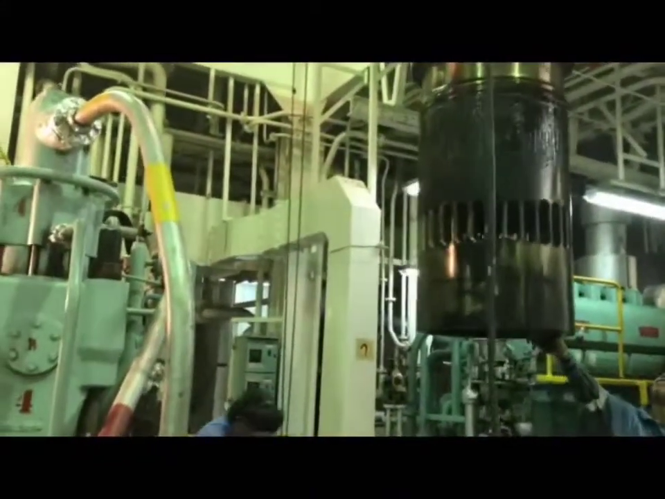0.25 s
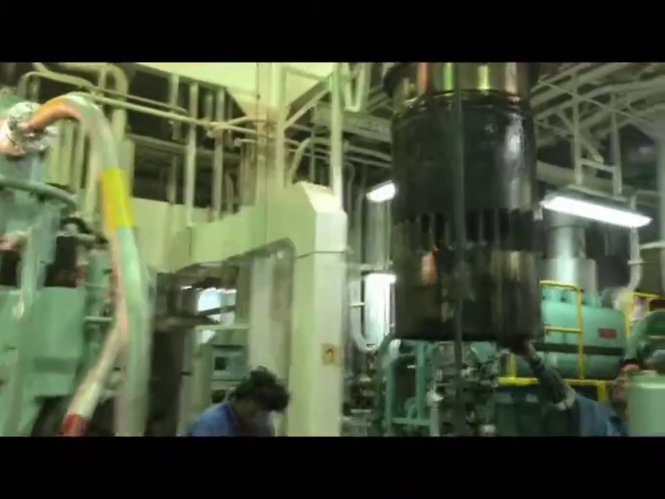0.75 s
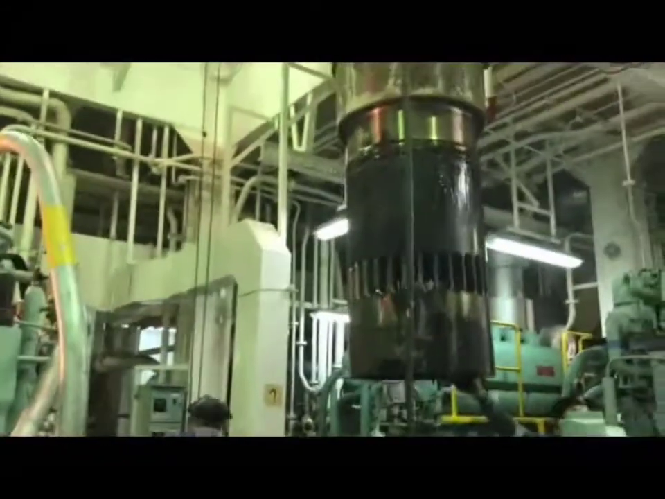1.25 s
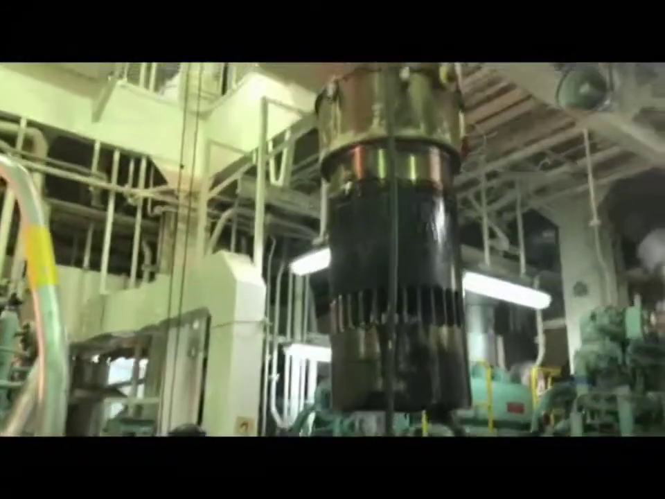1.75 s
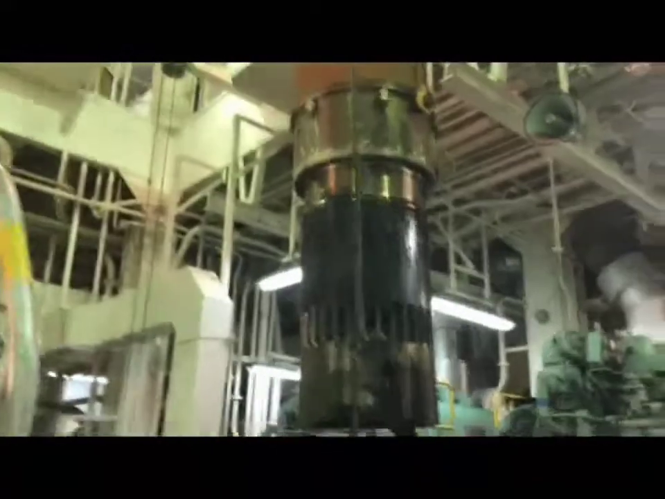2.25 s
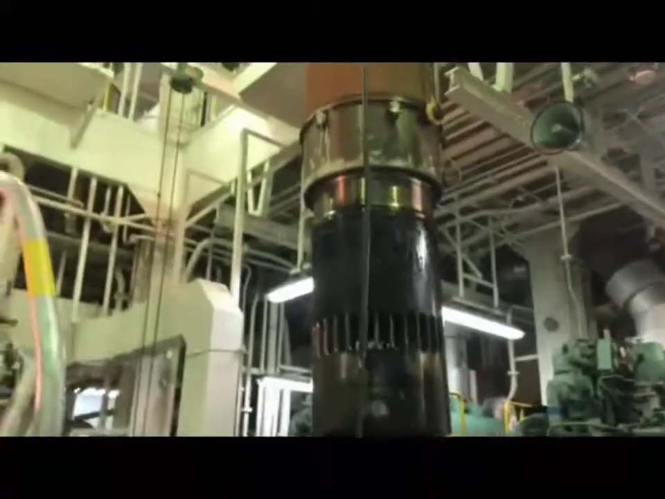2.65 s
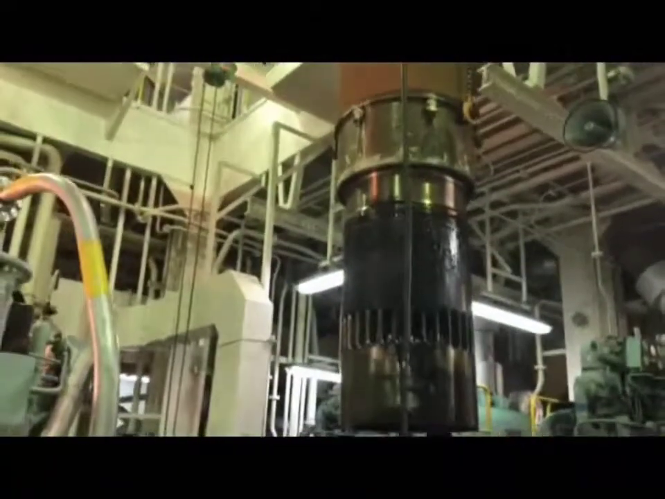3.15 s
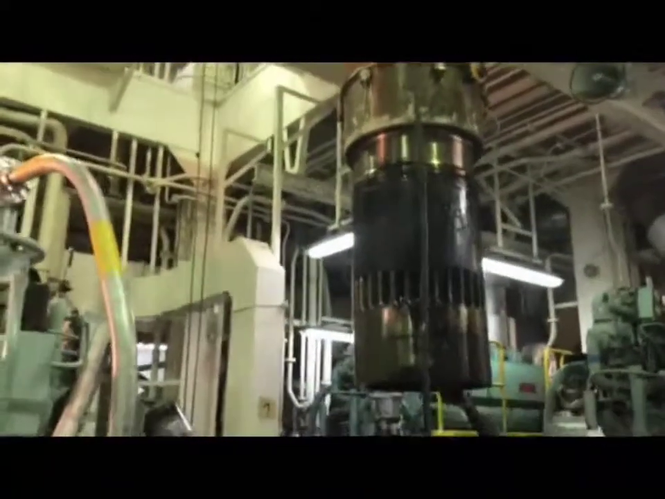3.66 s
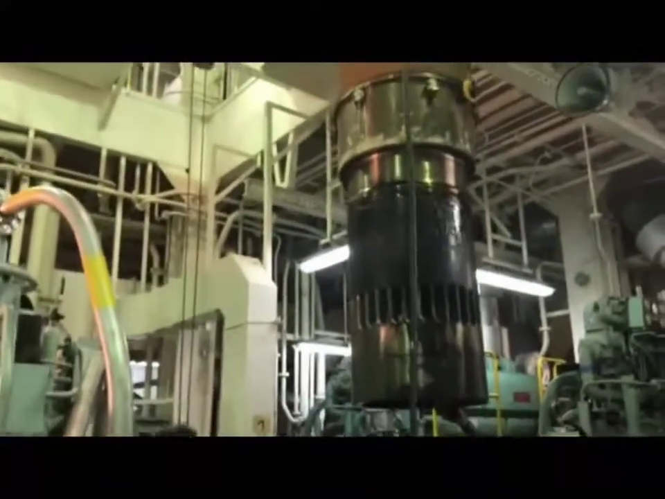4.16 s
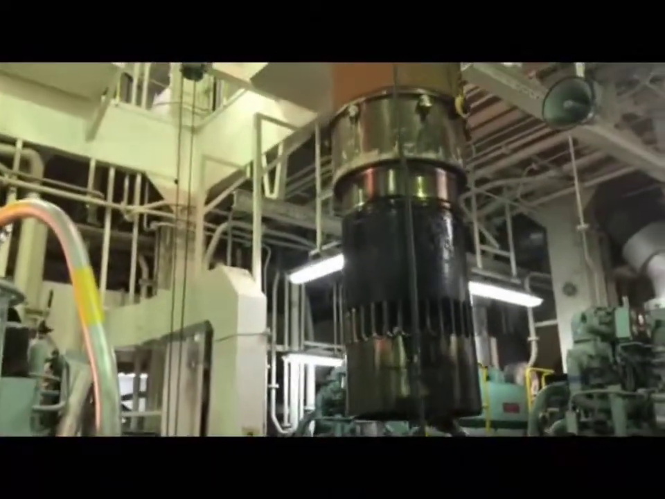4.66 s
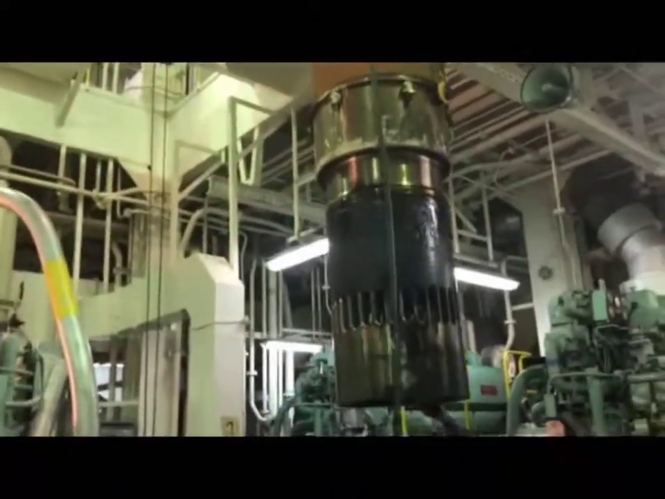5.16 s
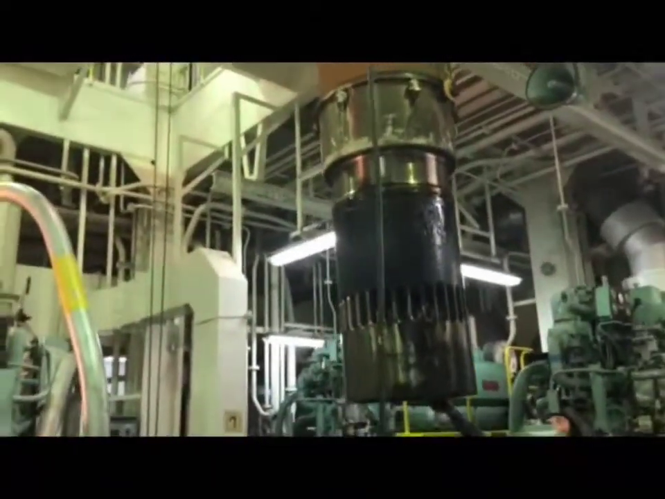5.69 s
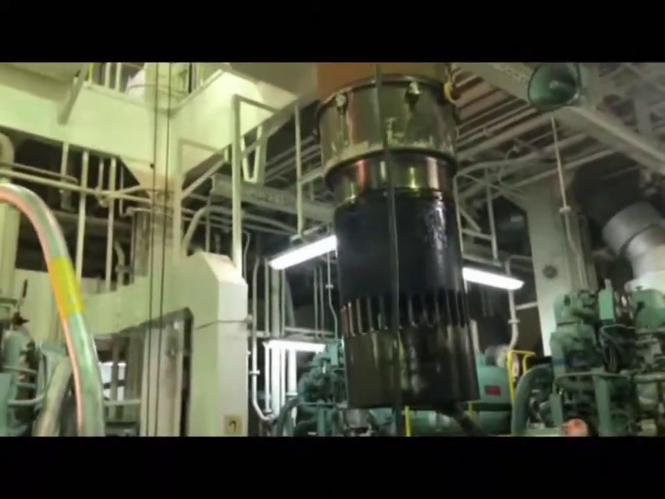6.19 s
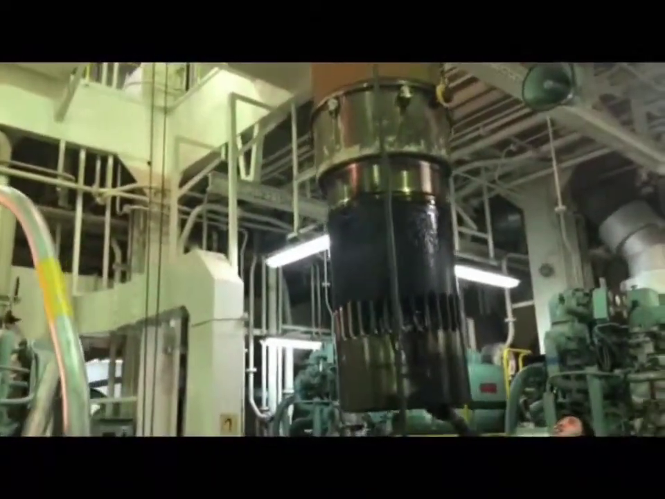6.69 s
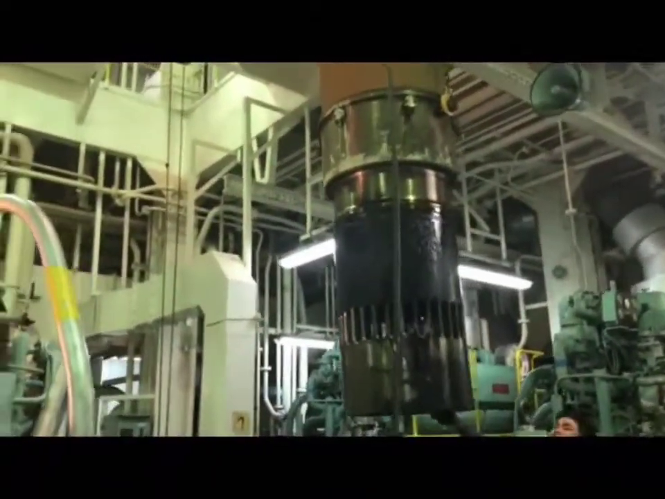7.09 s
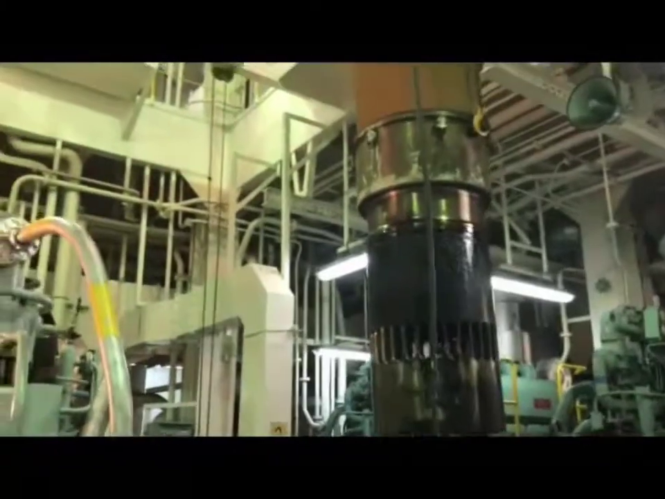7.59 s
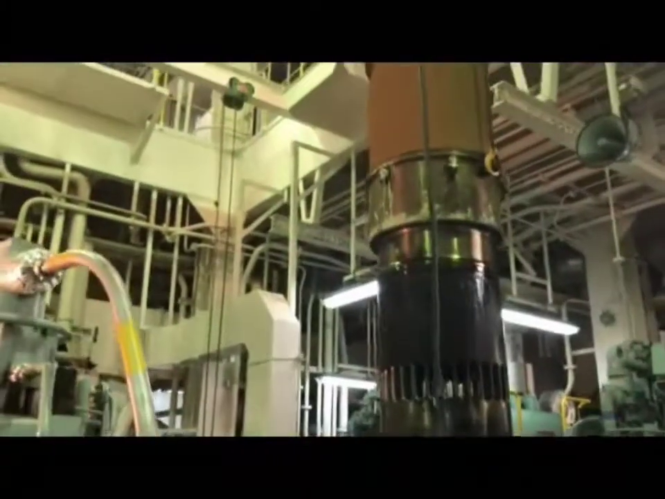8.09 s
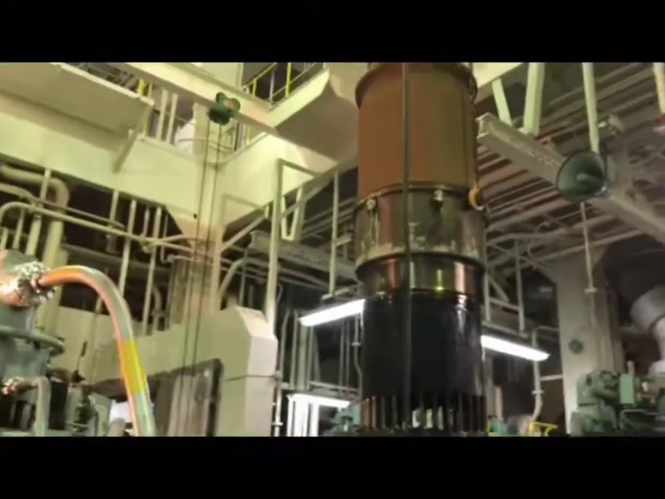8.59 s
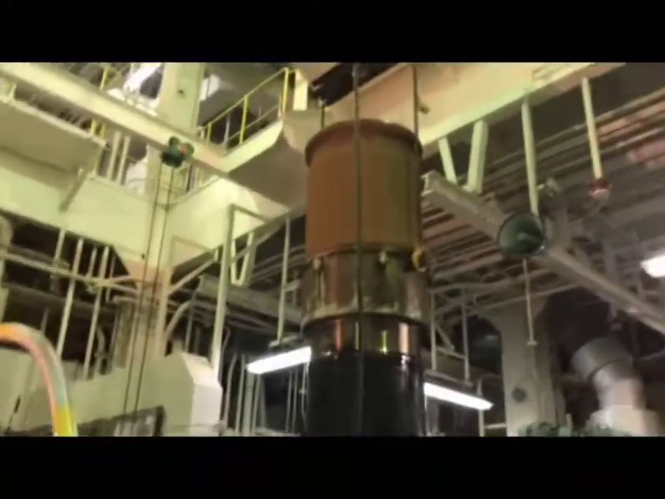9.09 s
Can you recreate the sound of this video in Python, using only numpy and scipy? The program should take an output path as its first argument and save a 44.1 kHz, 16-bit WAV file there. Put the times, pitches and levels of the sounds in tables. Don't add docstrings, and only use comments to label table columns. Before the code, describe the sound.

In a ship's engine room, a slow diesel generator throbs continuously at low pitch, shaking the hull, beneath steady ventilation roar, motor hum and thin air hiss. Sparse bright chain ticks come from a hoist lifting a large cylinder, densest midway. Later there are faint squeaks, dull deck knocks, a short scuff and final ticks. One mono microphone hears it all, with the drone dominating.

```python
import sys
import numpy as np
from scipy import signal
from scipy.fft import rfft, irfft, next_fast_len
from scipy.io import wavfile
from scipy.ndimage import uniform_filter1d, map_coordinates

SR = 44100
rng = np.random.default_rng(int(sys.argv[2]) if len(sys.argv) > 2 else 0)


def nominal_scale(level):
    x = np.asarray(level, float) / 20
    return 10 ** x


def put_to_file(sound):
    columns = np.atleast_2d(sound).T
    safe = np.clip(columns, -1, 1)
    whole_steps = np.round(safe * 32767)
    wavfile.write(sys.argv[1], SR, whole_steps.astype(np.int16))


N = 411894
T = np.arange(N) / SR


def unit(x):
    return x / np.sqrt(np.mean(x ** 2) + 1e-20)


def wobble(rate):
    knots = rng.standard_normal(int(N * rate / SR) + 4)
    return map_coordinates(knots, [T * rate])


def rush(spectrum, patchy_db, ducts=(), lo_hz=0, hi_hz=SR):
    z = signal.stft(rng.standard_normal(N + 512), nperseg=512)[2]
    field = uniform_filter1d(rng.standard_normal(z.shape), 8, 0)
    field = uniform_filter1d(field, 8, 1)
    white = signal.istft(z * nominal_scale(patchy_db * unit(field)), nperseg=512)[1]
    m = next_fast_len(N + 8192)
    hz = np.fft.rfftfreq(m, 1 / SR)
    f, db = np.transpose(spectrum)
    colour_db = np.interp(np.log(hz + 1), np.log(f + 1), db, -120, -120)
    power = 1 + sum(nominal_scale(2 * lift) / (1 + (2 * (hz - c) / w) ** 2) ** 2 for c, w, lift in ducts)
    shaped = rfft(white, m) * nominal_scale(colour_db) * np.sqrt(power)
    inside = irfft(shaped * (hz > lo_hz) * (hz < hi_hz), m)[:N]
    return irfft(shaped, m)[:N] / np.std(inside)


def rings(events, t60, spread):
    out = np.zeros(N + SR)
    t = np.arange(SR // 20) / SR
    envelope = 1 - np.exp(-t / 0.00043)
    for s, db, hz in events:
        detunings = np.linspace(-1, 1, num=5) + rng.normal(0, .2, size=5)
        ring = sum(np.sin(2 * np.pi * hz * (1 + spread * d) * t) for d in detunings)
        out[round(s * SR):][:len(t)] += nominal_scale(db - 8.5 - 60 * t / t60) * envelope * ring
    return out[:N]


def puff(event, spectrum):
    s, db, length = event
    u = np.clip(T - s, 0, None) / length
    return nominal_scale(db) * (1 - np.exp(-u / .12)) * np.exp(-u ** 1.6) * rush(spectrum, 1.5)


def phase_lag(k):
    pipe_order = 4
    if k < pipe_order:
        return 1.8 * (pipe_order - k) ** 1.55
    if k <= 6:
        return .21 * (k - pipe_order) ** 2
    return 1.4 * (k > 8)


def engine():
    # multiple of the cycle, peak level/dB
    throb = [(2, -60.6), (3, -58.1), (4, -36.4), (5, -39.7), (5.5, -54.7), (6, -43.1), (7, -55.3), (8, -69),
             (9, -56.9), (10, -60.7), (12, -62), (13, -74), (14, -68.5), (15, -63.4), (17, -72), (18, -68),
             (21, -72)]
    first_s, cycle_hz = .0036, 7.5427
    turn = 2 * np.pi * cycle_hz * (T - first_s)
    out = np.zeros(N)
    for k, db in throb:
        polarity = -1 if 8 < k < 11 else 1
        level = nominal_scale(db + .35 * wobble(2.5))
        out -= polarity * level * np.cos(k * turn - phase_lag(k) + 0.018 * wobble(3.1))
    return out


def hull():
    # f/Hz, level/dB per Hz
    rumble = [(3, -14), (16, -8), (28, -7), (32, 0), (40, -3), (54, -2.5), (72, -8), (84, -16), (130, -44)]
    return nominal_scale(-54.7) * rush(rumble, patchy_db=0.0)


def hoist():
    # t/s, peak level/dB, ring f/Hz
    ticks = [(1.3794, -62, 9050), (4.4413, -69, 8790), (4.6244, -56, 9800), (4.6623, -57, 9120),
             (4.8933, -59, 10200), (5.3946, -60, 10100), (5.4061, -50, 8900), (5.416, -64, 8900),
             (5.422, -62, 10100), (5.451, -57, 9470), (5.4694, -64, 8920), (9.0603, -54, 10000),
             (9.0912, -61, 9820), (9.3082, -59, 8630)]
    # t/s, peak level/dB, ring f/Hz
    clinks = [
        (5.398, -61, 5200),
        (5.436, -61, 6460),
        (6.414, -62, 2900),
        (6.42, -61, 3550),
        (9.061, -59, 5900),
    ]
    # t/s, level/dB, length/s
    scuffs = [
        (7.885, -58, .07),
        (7.95, -63.5, .045),
    ]
    # f/Hz, level/dB per Hz
    scuff_colour = [(500, -10), (800, 4), (1100, 9), (1600, -8), (2900, -4), (3800, -10), (4800, -19),
                    (7000, -18), (9500, -9), (11000, -22), (12000, -30)]
    struck = rings(ticks, t60=.016, spread=.065) + rings(clinks, t60=.02, spread=.07)
    return struck + sum(puff(scuff, scuff_colour) for scuff in scuffs)


def deck():
    # t/s, peak level/dB, ring f/Hz
    knocks = [
        (7.408, -56, 600),
        (7.437, -49, 480),
        (8.395, -49, 332),
    ]
    return rings(knocks, t60=.05, spread=.2)


def air_valve():
    # t/s, level/dB, length/s
    release = (4.1, -71.5, .05)
    # f/Hz, level/dB per Hz
    jet = [(3500, -30), (5000, -3), (6500, 0), (9000, -3), (11000, -30)]
    return puff(release, jet)


def sheave():
    # t/s, length/s, start f/Hz, peak level/dB
    squeaks = [
        (6.975, .115, 8250, -80),
        (7.275, .17, 8450, -83),
    ]
    settle_hz, settle_s, edge_s = 9250, .055, .012
    out = np.zeros(N)
    for s, length, start_hz, db in squeaks:
        u = np.clip(T - s, 0, length)
        climb_s = settle_s * (length / squeaks[0][1]) ** 4
        pitch_hz = settle_hz - (settle_hz - start_hz) * np.exp(-u / climb_s) + 60 * wobble(120)
        shape = np.clip(np.minimum(u, length - u) / edge_s, 0, 1)
        out += shape * nominal_scale(db + 2.5 * wobble(50)) * np.sin(2 * np.pi * np.cumsum(pitch_hz) / SR)
    return out


def tones(lines):
    out = np.zeros(N)
    for hz, db in lines:
        out += nominal_scale(db + .5 * wobble(2)) * np.sin(2 * np.pi * hz * T + rng.uniform(0, 6))
    return out


def motors():
    # f/Hz, peak level/dB
    hum = [(59.5, -66), (62.5, -66), (177.8, -71), (179, -70), (209.6, -75), (219.57, -61.2),
           (279.07, -73.4), (473, -79)]
    return tones(hum)


def converter():
    # f/Hz, peak level/dB
    whistles = [(9397, -99), (10115, -97), (10830, -105), (11217, -110)]
    return tones(whistles)


def air():
    # f/Hz, level/dB per Hz
    roar_colour = [(50, -40), (85, -10), (110, -6), (160, -7), (205, -11), (255, -14.5), (300, -12.5),
                   (450, -17), (600, -18), (875, -23.5), (1100, -22.5), (1270, -29.5), (1700, -35.5),
                   (2300, -75)]
    # f/Hz, level/dB per Hz
    hiss_colour = [(900, -25), (1300, -4), (1780, -7.5), (2200, -5), (3400, -7), (4300, -10.5),
                   (4700, -9.5), (7300, -13), (8800, -9.5), (10400, -13), (10780, -21), (11000, -28),
                   (11450, -25), (12200, -38)]
    # f/Hz, width/Hz, lift/dB
    duct_modes = [(134, 22, 1), (184.6, 26.3, 5.5), (219.2, 8.4, 5.5), (243.3, 13, 4.5), (273.7, 13, 2.5),
                  (303, 9.3, -5.5), (379.7, 20, 2), (512.5, 18, 3), (536, 24, 2.5), (565, 19, 4.5),
                  (725, 31, 4.5), (953, 18, 1.5), (1023, 16, 6), (1078, 16, 1), (1114, 26, 10),
                  (1198, 30, 3), (1725, 22, 2.5), (1930, 103, 3.5), (2770, 48, 1), (3362, 42, -8)]
    roar_db, hiss_db = -61, -70.5
    flutter = 0.31 * wobble(3.02) + 0.21 * wobble(9) + 0.33 * wobble(35)
    roar = rush(roar_colour, 0.62, duct_modes, lo_hz=259, hi_hz=1400)
    hiss = rush(hiss_colour, 0.63, duct_modes, lo_hz=1500, hi_hz=11100)
    return nominal_scale(roar_db + 0.39 * flutter) * roar + nominal_scale(hiss_db + 0.97 * flutter) * hiss


def scene():
    machine = engine() + hull()
    events = hoist() + deck() + air_valve() + sheave()
    background = motors() + converter() + air()
    return (machine + events + background)[None]


def low_pass(x):
    return signal.sosfilt(signal.butter(12, 11910, fs=SR, output="sos"), x)


def record(dry):
    # t/s, level/dB
    ducks = [
        (.595, -5),
        (4.705, -3),
        (5.27, -2.5),
        (7.755, -2.5),
        (8.545, -3.5),
    ]
    half_width_s = .011
    gain_db = sum(db * np.exp(-((T - s) / half_width_s) ** 2) for s, db in ducks)
    click = nominal_scale(-48 - 60 * T / .01) * rng.standard_normal(N)
    return low_pass(dry * nominal_scale(gain_db) + click)


dry = scene()
out = record(dry)
put_to_file(out)
```